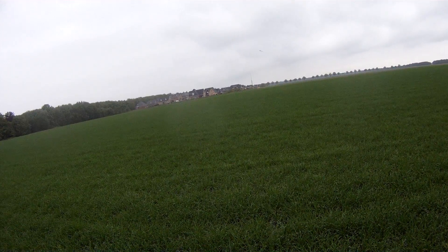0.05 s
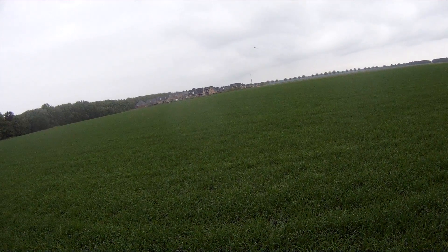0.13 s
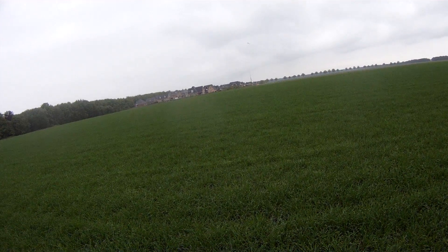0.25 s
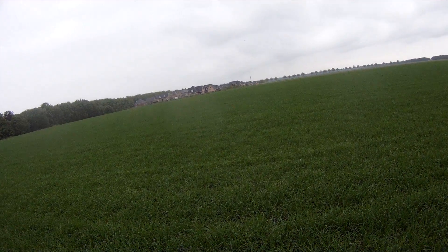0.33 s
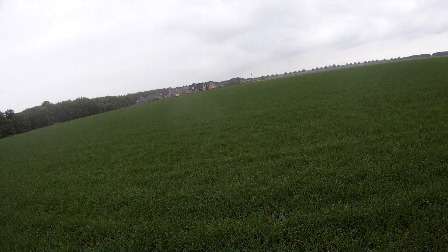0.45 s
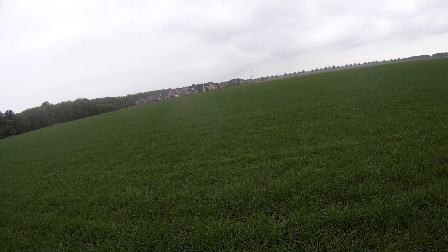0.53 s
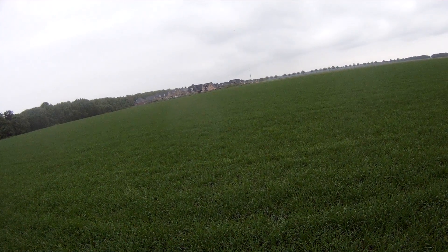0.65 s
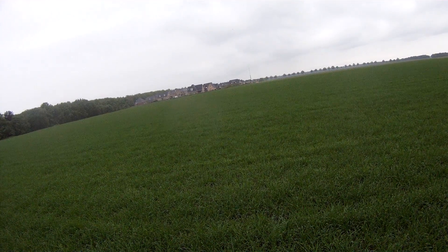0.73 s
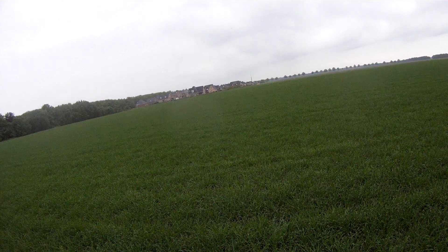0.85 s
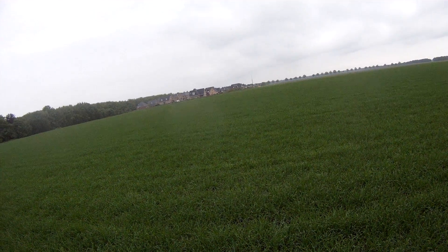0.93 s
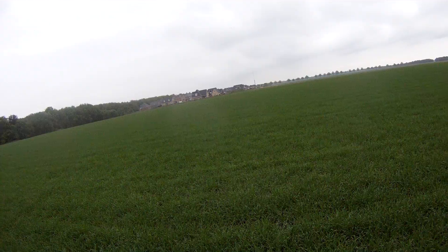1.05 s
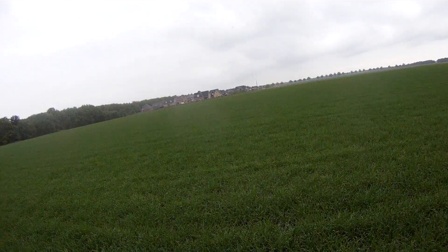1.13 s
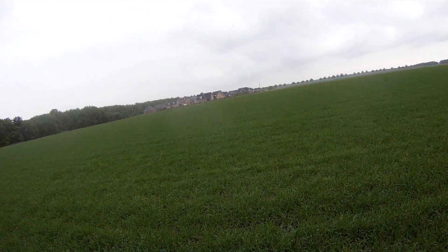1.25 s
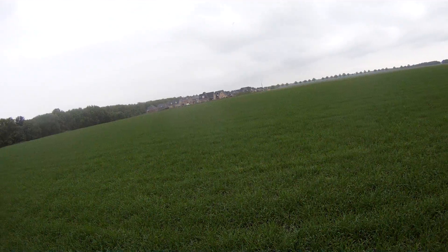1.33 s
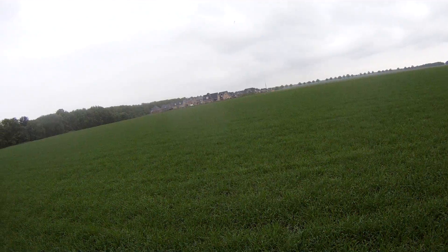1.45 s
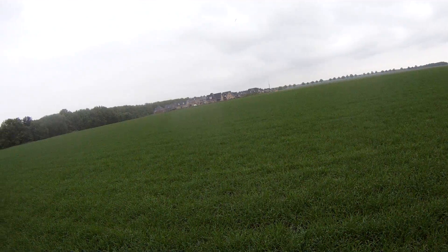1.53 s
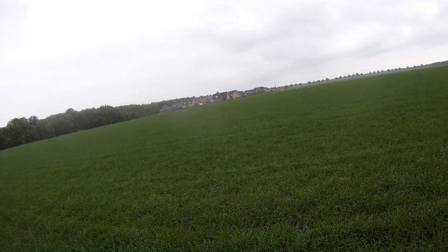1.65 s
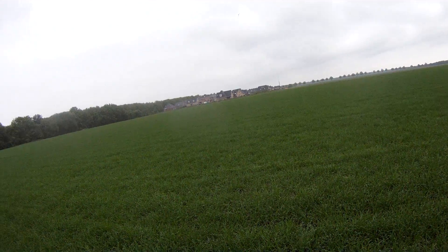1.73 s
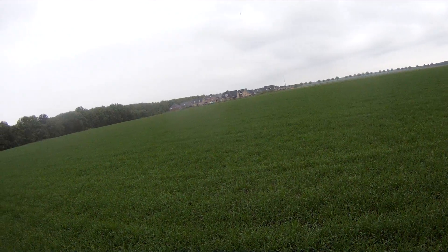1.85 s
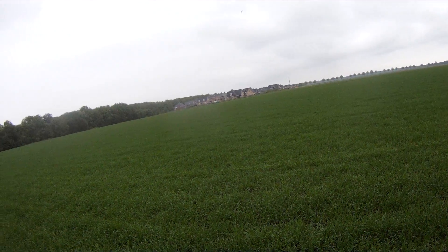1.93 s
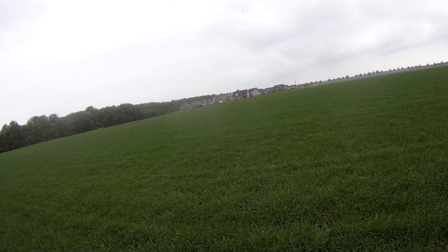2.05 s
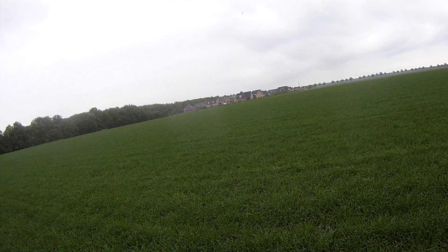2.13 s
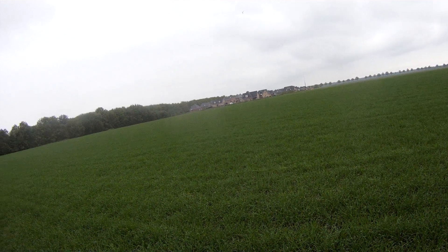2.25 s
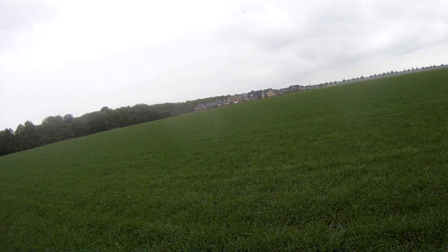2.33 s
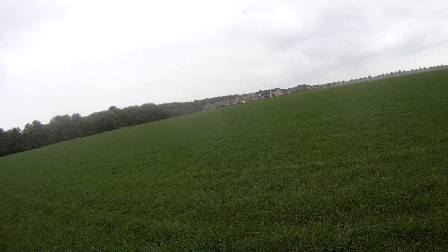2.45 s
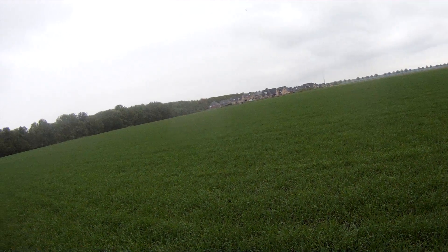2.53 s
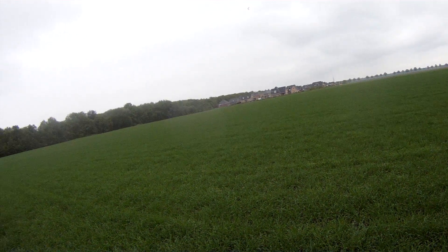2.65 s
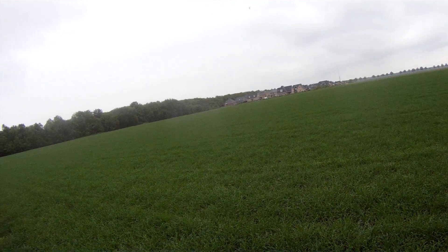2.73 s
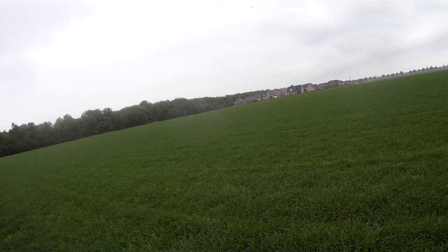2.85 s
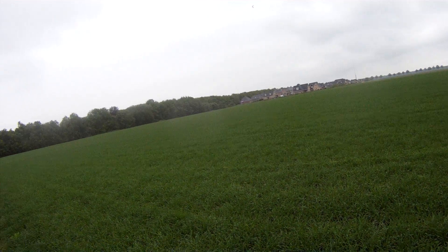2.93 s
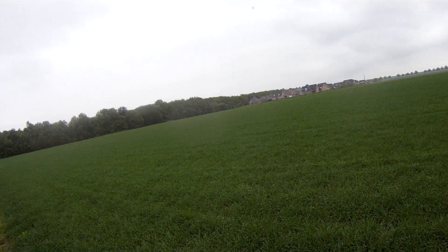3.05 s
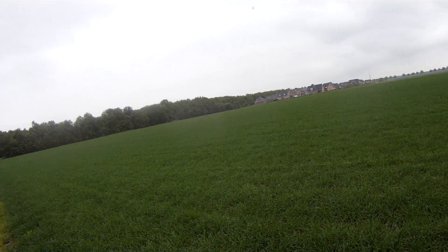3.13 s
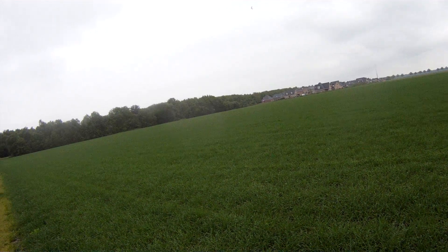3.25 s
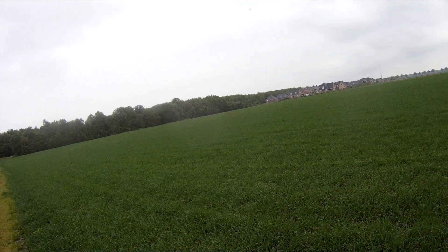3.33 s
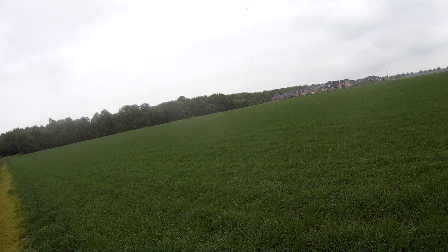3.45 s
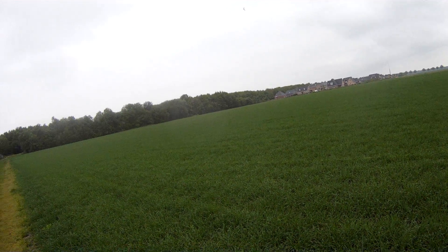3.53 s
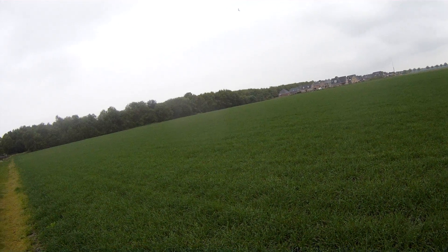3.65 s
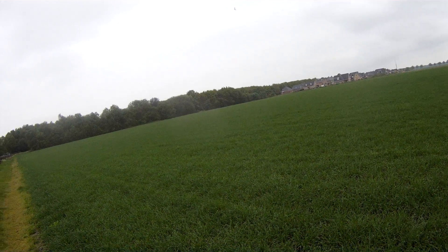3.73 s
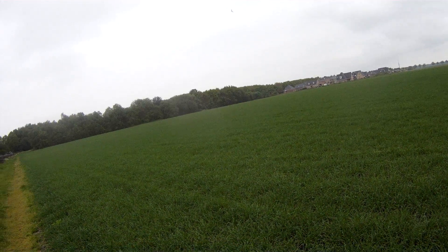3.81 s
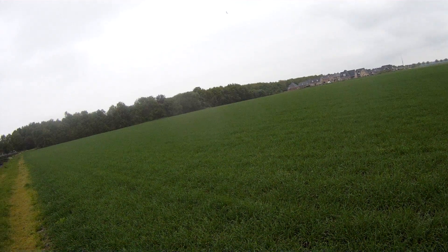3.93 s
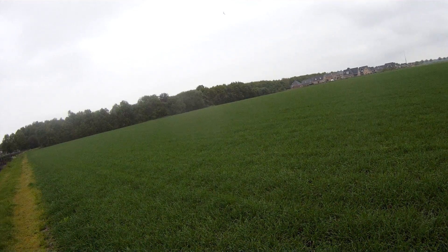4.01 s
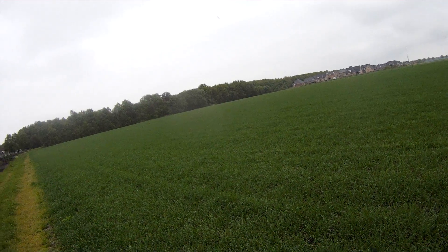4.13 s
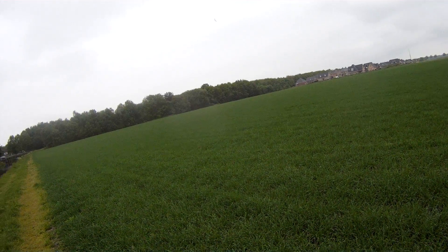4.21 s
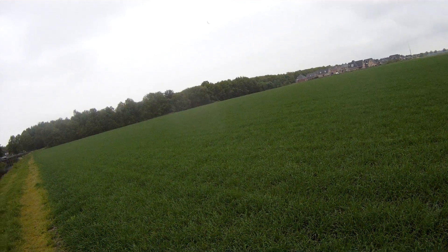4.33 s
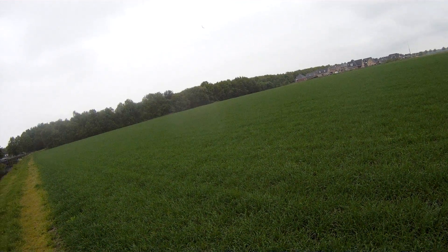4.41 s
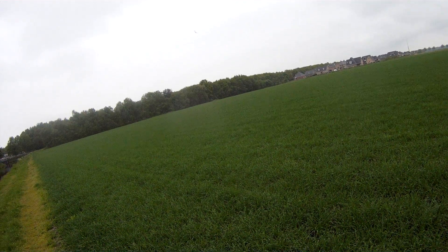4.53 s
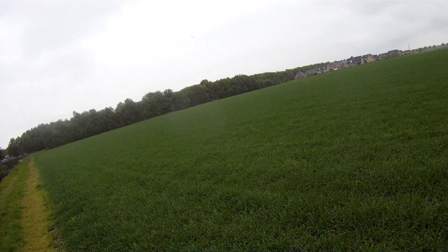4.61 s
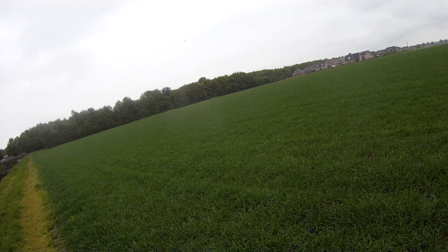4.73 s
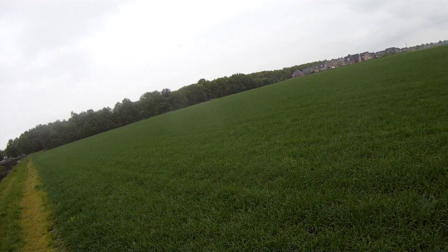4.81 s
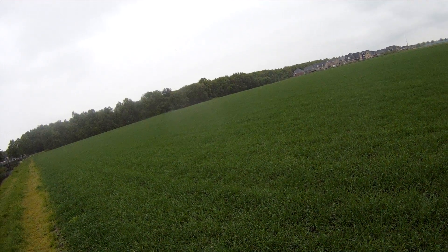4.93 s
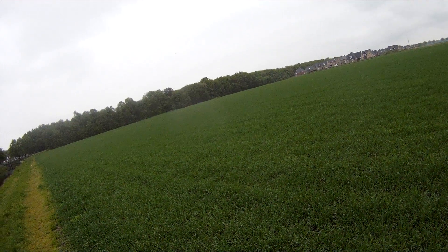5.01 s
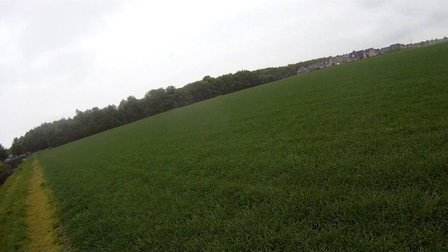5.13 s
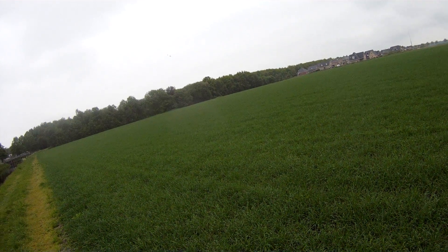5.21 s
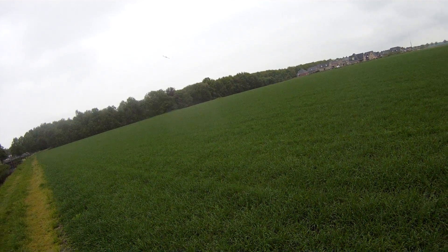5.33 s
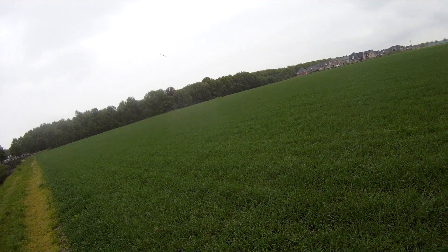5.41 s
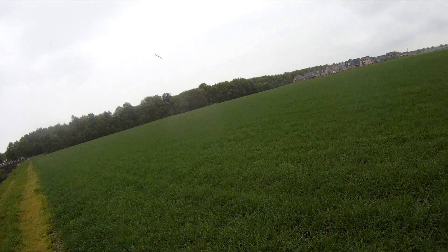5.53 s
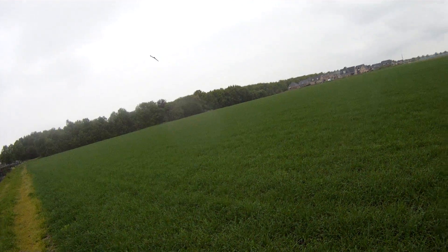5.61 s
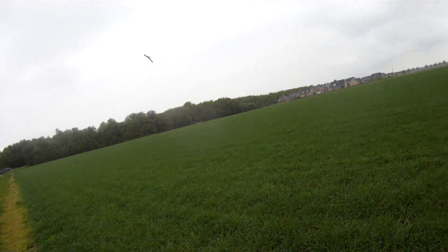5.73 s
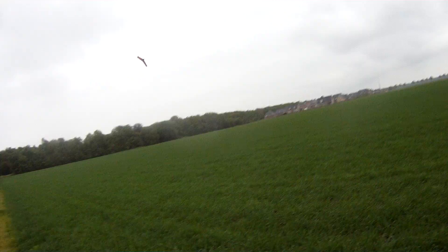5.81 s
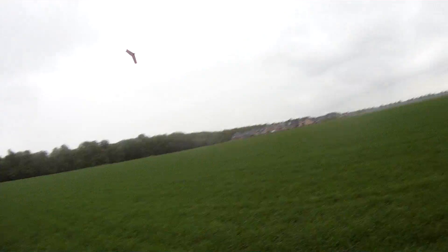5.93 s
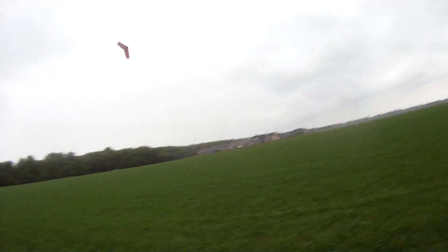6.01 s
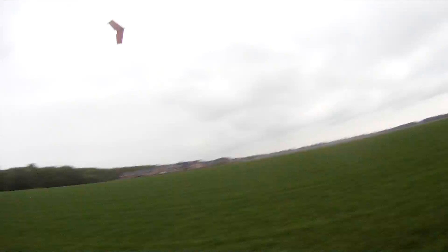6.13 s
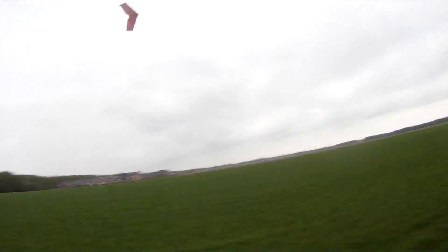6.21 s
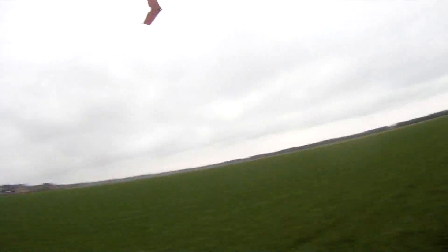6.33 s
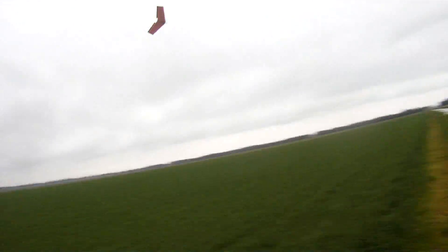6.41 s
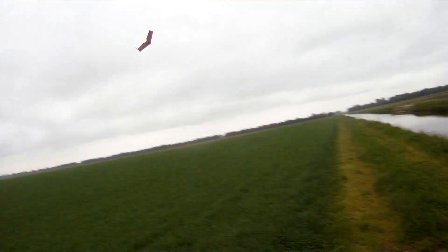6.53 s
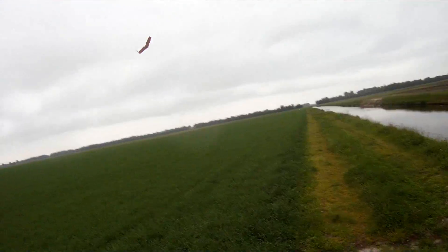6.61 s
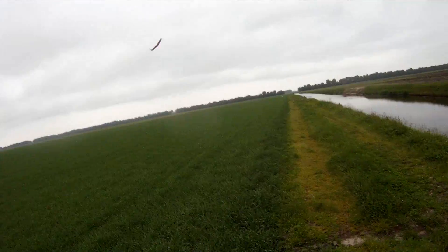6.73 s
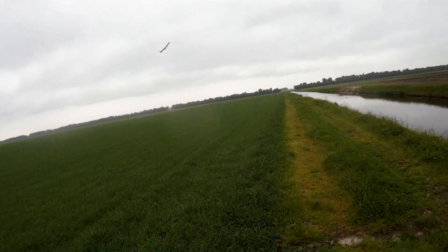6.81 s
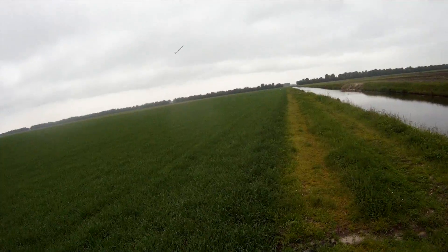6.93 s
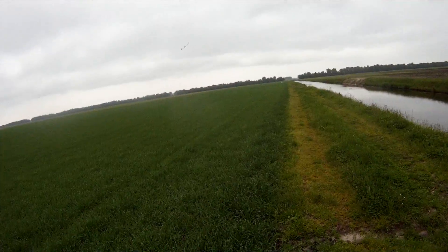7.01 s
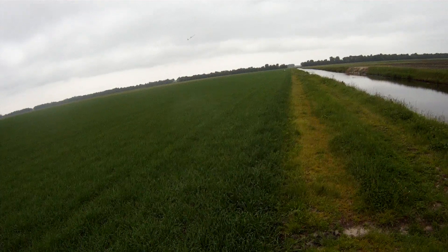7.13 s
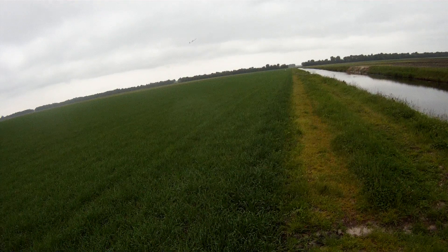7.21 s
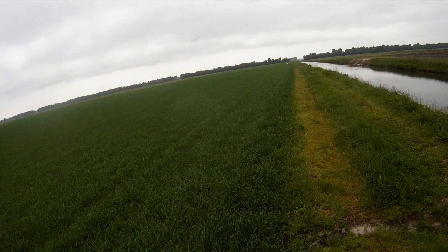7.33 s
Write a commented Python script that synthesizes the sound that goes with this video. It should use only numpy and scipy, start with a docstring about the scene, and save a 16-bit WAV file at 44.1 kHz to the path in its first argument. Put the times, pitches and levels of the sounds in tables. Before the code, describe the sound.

A model aircraft with a small glow engine drones continuously over an open field. Its nasal, gritty buzz wavers at a distance, climbs in pitch as it dives, and swells sharply into a close overhead pass. The pitch falls as it goes by, then the buzz shrinks away with two brief sputters near the end. Low wind puffs bump a small, low-quality camera microphone.

```python
"""Model aircraft passing overhead

A model aircraft with a two-stroke glow engine circles over a field, dives and passes close overhead.
Each firing is a pulse that rings the muffler; it arrives directly and off the ground, so a comb sweeps the buzz.
Sine tones on the lowest shaft orders make the drone, and pulsing noise makes the propeller wash.
Coloured noise makes the quiet field, a far rush and the wind that buffets a small camera.
The camera samples at a low rate and holds each sample, which mirrors the buzz into the treble."""
import sys
import numpy as np
from scipy import signal
from scipy.fft import rfft, irfft, next_fast_len
from scipy.io import wavfile
from scipy.ndimage import uniform_filter1d, map_coordinates

SR = 44100
rng = np.random.default_rng(int(sys.argv[2]) if len(sys.argv) > 2 else 0)


def log_audio(samples):
    """Write samples as a 16-bit WAV file to the path given in sys.argv[1]."""
    # one column per channel
    frames = np.atleast_2d(samples).T
    # limit to full scale, then quantise
    limited = np.clip(frames, -1, 1)
    pcm = np.round(limited * 32767).astype(np.int16)
    wavfile.write(sys.argv[1], SR, pcm)


N = 324576
TIME = np.arange(N) / SR

# engine stumbles: t/s, half width/s, noise level against the cracks/dB
STUMBLES = [(5.168, .003, -11), (6.98, .005, -5), (7.012, .007, -3)]
# the pass: when and how near it comes, how fast it flies, and the limit its distance nears before and after
PASS_S, CLOSEST_M, SPEED_M_PER_S, CIRCLE_M = 6.31, 9.9, 33, 80


def amp(db):
    """Decibels to gain."""
    return 10 ** (np.asarray(db) / 20)


def unit(x):
    """Scale to rms 1."""
    return x / np.sqrt(np.mean(x ** 2) + 1e-20)


def steadied(x):
    """Scale to a running rms of 1."""
    power = np.abs(uniform_filter1d(x ** 2, size=6000))
    return x / np.sqrt(power + 1e-12)


def along(points, hz):
    """Read (f/Hz, value) points on a log frequency axis."""
    f, v = np.transpose(points)
    return np.interp(np.log(hz + 1), np.log(f + 1), v)


def curves(rows):
    """One value per sample for each column after the time."""
    s, *columns = np.transpose(rows)
    return [np.interp(TIME, s, column) for column in columns]


def hump(s, half_width):
    """A smooth swell of height 1 around time s, down to 1/e at the half width."""
    return np.exp(-((TIME - s) / half_width) ** 2)


def wobble(rate):
    """A smooth random curve, rate knots a second."""
    knots = rng.standard_normal(int(N * rate / SR) + 4)
    return map_coordinates(knots, [TIME * rate])


def filtered(x, response):
    """Multiply the spectrum of x by a response of frequency."""
    m = next_fast_len(N + SR // 2)
    hz = np.fft.rfftfreq(m, 1 / SR)
    return irfft(rfft(x, m) * response(hz), m)[:N]


def noise(colour):
    """Coloured noise of rms 1."""
    return unit(filtered(rng.standard_normal(N), lambda hz: amp(along(colour, hz))))


def ring(x, colour, size=2048):
    """Minimum-phase colour: each pulse rings after it strikes."""
    hz = np.fft.rfftfreq(size, 1 / SR)
    cepstrum = irfft(np.log(amp(along(colour, hz))))
    # folding the cepstrum makes the response causal
    cepstrum[1:size // 2] *= 2
    cepstrum[size // 2 + 1:] = 0
    impulse = irfft(np.exp(rfft(cepstrum)))
    return signal.fftconvolve(x, impulse)[:N]


def field():
    """The quiet of the open field is steady noise; one faint far rush swells and dies away."""
    # colour of the quiet: f/Hz, level/dB
    quiet_colour = [(40, -6), (78, 9), (110, -1), (200, -4), (350, -5), (550, -3), (800, -7), (1300, -15),
                    (2300, -15), (4000, -20), (5600, -24)]
    # colour of the rush: f/Hz, level/dB
    rush_colour = [(200, -39), (400, 1), (620, 22), (800, -2), (1100, -59), (2500, -45)]
    quiet = amp(-57.0) * noise(quiet_colour)
    rush = amp(-62) * hump(2.5, half_width=0.77) * noise(rush_colour)
    return quiet + rush


def wind(flutter_db, eddy_db, gust_db):
    """Eddies in the breeze thump the microphone as low noise; the gusts reach higher."""
    # the breeze between gusts, before its eddies: t/s, level/dB
    breeze_levels = [(0, -51), (1, -54), (2.35, -57), (2.9, -48.5), (3.7, -50.5), (5.2, -47.5),
                     (5.7, -41.5), (6.2, -51.5), (6.9, -36.5), (7.36, -35.5)]
    # gusts before the gust trim: t/s, half width/s, flutter level/dB, buffet level/dB
    gust_events = [(0.237, 0.043, -56, -40), (0.286, 0.02, -44.5, -34), (0.751, 0.015, -62, -44.5),
                   (3.243, 0.08, -44, -41.5), (3.38, 0.086, -57, -41), (4.019, 0.043, -46, -36.5),
                   (4.125, 0.085, -41, -36), (4.86, 0.13, -59, -48.5), (5.116, 0.044, -41.5, -38),
                   (5.809, 0.094, -47.5, -39), (6.408, 0.02, -49, -44), (6.57, 0.016, -44, -50),
                   (6.717, 0.026, -41.5, -33.5), (7.001, 0.035, -43, -50), (7.25, 0.1, -52, -50)]
    # colour of the low thumping: f/Hz, level/dB
    buffet_colour = [(15, -13.5), (30, 2), (55, 2), (80, 2.5), (115, -9.5), (170, -50), (400, -42),
                     (1500, -68), (4000, -90)]
    # colour of the higher flutter: f/Hz, level/dB
    flutter_colour = [(60, -18), (110, 0.5), (135, 2), (170, -3), (210, -13), (350, -24), (700, -38),
                      (1500, -58), (4000, -90)]
    breeze = amp(curves(breeze_levels)[0] + eddy_db * wobble(12))
    buffet = breeze
    flutter = amp(flutter_db) * breeze
    for s, half_width, high_db, low_db in gust_events:
        gust = amp(gust_db) * hump(s, half_width)
        buffet = np.hypot(buffet, amp(low_db) * gust)
        flutter = np.hypot(flutter, amp(high_db) * gust)
    thumps = buffet * steadied(noise(buffet_colour))
    flutters = flutter * amp(1.5 * wobble(30)) * steadied(noise(flutter_colour))
    return thumps + flutters


def trees(x):
    """The tree line scatters sound back as a faint, late tail of decaying noise."""
    # decay of the scatter: f/Hz, t60/s
    decay = [(200, 0.07), (2000, 1), (6000, 0.043)]
    hz, t, z = signal.stft(rng.standard_normal(SR), SR, nperseg=256)
    fading = amp(-60 * t / along(decay, hz)[:, None])
    tail = signal.istft(z * fading, SR, nperseg=256)[1]
    late_tail = np.pad(tail / np.linalg.norm(tail), (SR // 20, 0))  # 50 ms late
    return signal.fftconvolve(x, late_tail)[:N]


def distance():
    """Metres to the aircraft: a wide circle that opens into a straight pass."""
    straight = np.hypot(CLOSEST_M, SPEED_M_PER_S * (TIME - PASS_S))
    return (straight ** -4 + CIRCLE_M ** -4) ** -.25


def heard(rows):
    """Level curves in dB, less the spreading loss over the distance."""
    spreading_db = 20 * np.log10(CLOSEST_M / distance())
    return [db + spreading_db for db in curves(rows)]


def off_ground(x):
    """The reflection from the field lags more the more steeply the aircraft stands overhead."""
    # the aircraft climbs, dives and levels out: t/s, height/m
    height = [(0.0, 18.2), (1.97, 31.1), (3.35, 33.4), (3.71, 32.3), (4.01, 29.6), (5.0, 12.6), (5.43, 9.0),
              (6.48, 7.8), (7.36, 7.7)]
    mic_height_m, sound_m_per_s = 1.6, 343
    lag = 2 * mic_height_m / sound_m_per_s * curves(height)[0] / distance()
    return map_coordinates(x, [(TIME - lag) * SR], order=3)


def shimmer(x, depth_db, smear):
    """Moving air makes neighbouring bands swell and fade on their own, and blunts each crack."""
    z = signal.stft(x, nperseg=1024)[2]
    patches = rng.standard_normal((2, *z.shape))
    for _ in range(3):
        patches = uniform_filter1d(patches, size=5, axis=1)  # across frequency
        patches = uniform_filter1d(patches, size=14, axis=2)  # across time
    swell, turn = unit(patches)
    moved = z * amp(depth_db * swell) * np.exp(1j * smear * turn)
    return signal.istft(moved, nperseg=1024)[1][:N]


def firing_rate(waver):
    """Firings a second: the engine wavers a little, and sags for a moment at each misfire."""
    # firing rate before waver and sags, Doppler shift included: t/s, f/Hz
    flight = [(0.0, 239.4), (0.94, 234.0), (1.05, 235.9), (1.6, 234.0), (1.86, 229.5), (2.27, 233.4),
              (2.5, 229.5), (2.67, 234.4), (2.9, 236.2), (3.21, 236.0), (4.47, 268.2), (4.81, 281.7),
              (5.02, 282.2), (5.11, 286.7), (5.44, 279.4), (5.71, 275.9), (5.86, 267.5), (6.16, 261.7),
              (6.33, 248.7), (6.5, 240.2), (7.02, 236.6), (7.36, 236.9)]
    sag_hz_per_s = 577  # deepest sag per second of the misfire's half width
    deepest_after_s = 0.0202  # from the misfire to the deepest sag; the speed then recovers
    hz = curves(flight)[0] * (1 + waver * wobble(14))
    for s, half_width, _ in STUMBLES:
        since = np.maximum(TIME - s, 0) / deepest_after_s
        hz = hz - sag_hz_per_s * half_width * since * np.exp(1 - since)
    return hz


def drone(turns, level_db):
    """Exhaust flow and propeller blades give clean tones on the lowest orders of the shaft."""
    # at the closest distance, before the drone's trim: t/s, exhaust fundamental/dB,
    # propeller blade tone/dB, third order/dB, overtones/dB
    order_levels = [(0.0, -36, -26, -37.5, -34), (0.99, -37, -45, -40.5, -36.5),
                    (1.51, -38, -43, -51.5, -39.5), (1.81, -41, -39, -45, -35),
                    (2.76, -45.5, -34.5, -52.5, -42), (3.19, -57, -40, -52.5, -43.5),
                    (3.75, -38.5, -34.5, -36.5, -36), (4.7, -43, -31, -50.5, -30.5),
                    (4.86, -46, -29, -39.5, -34.5), (5.98, -30, -36.5, -45, -35),
                    (6.44, -39.5, -30.5, -33.5, -34), (7.36, -34, -40.5, -41.5, -38)]
    # each overtone's share of the overtone level: shaft order, level/dB
    overtone_shares = [(4, -10), (5, -14.5), (6, -14)]
    *low_db, overtone_db = heard(order_levels)
    orders = list(enumerate(low_db, 1))
    orders += [(round(k), overtone_db + db) for k, db in overtone_shares]
    tones = 0
    for k, db in orders:
        loudness = amp(db + 0.43 * wobble(20))
        tones = tones + loudness * np.sin(2 * np.pi * (k * turns + rng.random()))
    return amp(level_db) * np.sqrt(2) * (tones + 0.67 * off_ground(tones))


def firings(turns, scatter_db, jitter_ms):
    """One pulse per turn of the shaft, each a little different in size and timing."""
    at = np.interp(np.arange(1, int(turns[-1])), turns, TIME)
    chance = rng.standard_normal((len(at), 2))
    at = (at + jitter_ms * chance[:, 0] / 10 ** 3) * SR
    # a windowed sinc sets each pulse between samples
    taps = at.astype(int)[:, None] + np.arange(-7, 9)
    offset = taps - at[:, None]
    shape = np.sinc(offset) * np.cos(np.pi * offset / 16) ** 2
    pulses = shape * amp(scatter_db * chance[:, 1:])
    return np.bincount(np.clip(taps, 0, N - 1).ravel(), pulses.ravel(), N)


def exhaust(turns, wash_db):
    """Cracks ring the muffler; uneven grass reflects them patchily, and the propeller adds a pulsing wash."""
    # cracks as the aircraft turns, at the closest distance, before fades and the edge's lift:
    # t/s, muffler ring level/dB, sharp edge level/dB
    crack_levels = [(0.0, -22, -28), (1.54, -25.5, -31.7), (1.84, -23, -28.5), (2.31, -23.5, -32.5),
                    (3.09, -27, -30.5), (3.25, -29, -36), (3.42, -23, -30), (3.68, -27, -31.5),
                    (5.88, -25, -21.5), (6.31, -23, -26), (6.44, -24.5, -29.5), (6.67, -24, -25.5),
                    (7.36, -27, -33.3)]
    # brief fades of the cracks during the turn: t/s, half width/s, level/dB
    fades = [(.68, 0.16, -3.5), (3.05, 0.085, -8), (4.34, .1, -6.5)]
    # colour of the muffler ring: f/Hz, level/dB
    muffler_colour = [(1000, -34), (1450, -31.5), (1650, -5.5), (1900, -0.5), (2150, 6), (2350, 5),
                      (2550, -3), (2850, 0.5), (3200, -8.5), (4000, -12), (5500, -28)]
    # colour of the sharp edge: f/Hz, level/dB
    edge_colour = [(1200, -62.5), (2000, -45), (2800, -13.5), (3300, -0.5), (3700, 1), (4300, -1),
                   (5000, -5.5), (5600, -10)]
    # colour of the propeller wash and misfire puffs: f/Hz, level/dB
    wash_colour = [(150, -15), (350, 1.5), (600, 8.5), (1000, -15), (1400, -14), (2200, 7), (3500, 11),
                   (5600, 4)]
    fade_db = sum(db * hump(s, half_width) for s, half_width, db in fades)
    muffler_db, edge_db = heard(crack_levels) + fade_db
    direct = shimmer(firings(turns, scatter_db=.4, jitter_ms=.002), depth_db=3, smear=.8)
    pulses = direct + .5 * off_ground(shimmer(direct, depth_db=2.5, smear=.45))
    muffler = amp(muffler_db) * steadied(ring(pulses, muffler_colour))
    edge = amp(edge_db + 4.47) * steadied(ring(pulses, edge_colour))
    cracks = muffler + edge
    loudness = np.hypot(amp(muffler_db), amp(edge_db))
    # the wash swells once a turn and stands out more when the exhaust is loud
    air = noise(wash_colour)
    swell = unit(np.exp(0.69 * np.cos(2 * np.pi * turns)))
    prominence = (loudness / loudness.max()) ** .42
    hiss = amp(wash_db) * prominence * swell * (air + .5 * off_ground(air))
    # a misfire dips the cracks and adds a puff of noise
    for s, half_width, db in STUMBLES:
        stumble = hump(s, half_width)
        cracks = cracks * (1 - 0.65 * stumble)
        hiss = hiss + amp(db) * stumble * air
    return cracks + loudness * hiss


def scene():
    """The quiet of the field, the wind, and the aircraft with its scatter from the trees."""
    turns = np.cumsum(firing_rate(waver=0.000906)) / SR
    aircraft = exhaust(turns, wash_db=-8.5) + drone(turns, level_db=0.78)
    scatter = amp(-24) * trees(aircraft)
    gusts = wind(flutter_db=-14, eddy_db=1.0, gust_db=0.6)
    return (aircraft + scatter + gusts + field())[None]


def record(dry):
    """The camera keeps a narrow band and holds each sample, mirroring that band about the sampling rate."""
    hold_hz, band_hz, top_hz = 12000, 5720, 15300  # sampling rate, band edge before it, final cutoff
    narrow = filtered(dry[0], lambda hz: 1 / np.sqrt(1 + (hz / band_hz) ** 70))
    sampled = narrow * (1 + 2 * np.cos(2 * np.pi * hold_hz * TIME))
    # holding each sample droops the treble as a sinc
    return filtered(sampled, lambda hz: np.sinc(hz / hold_hz) * (hz < top_hz))[None]


dry = scene()
out = record(dry)
log_audio(out)
```